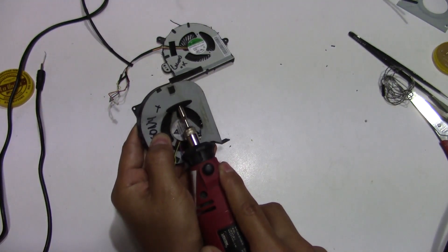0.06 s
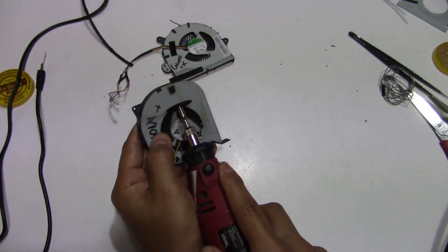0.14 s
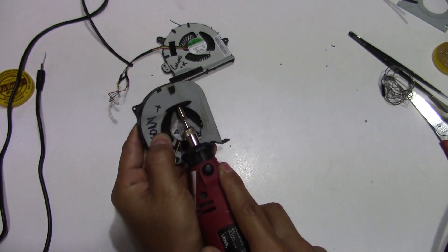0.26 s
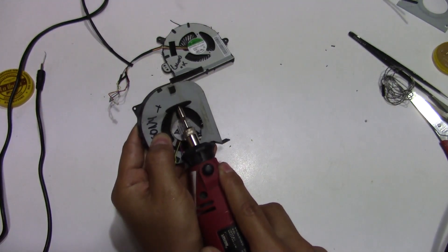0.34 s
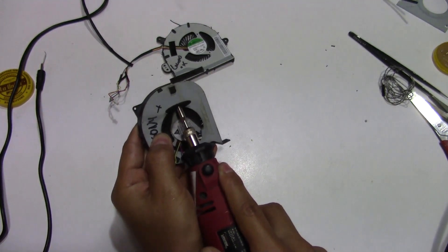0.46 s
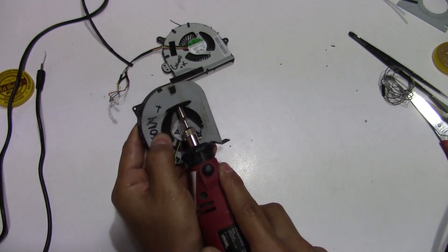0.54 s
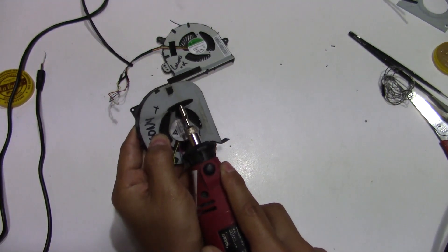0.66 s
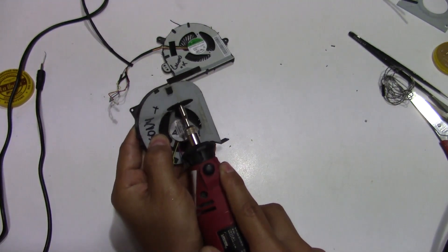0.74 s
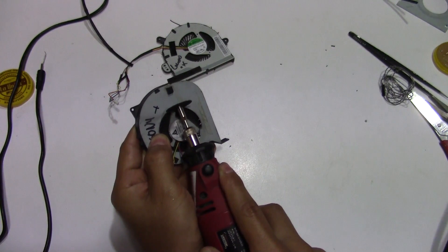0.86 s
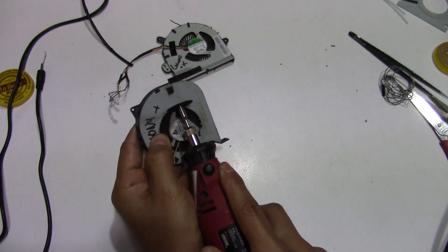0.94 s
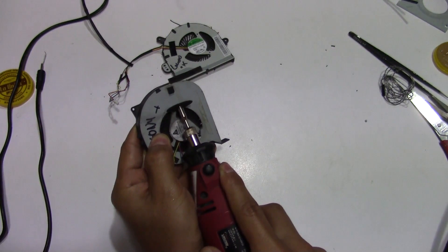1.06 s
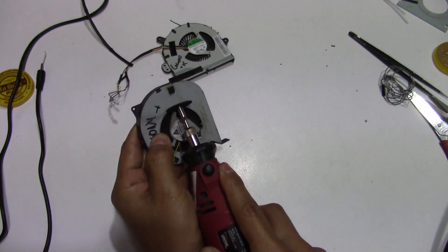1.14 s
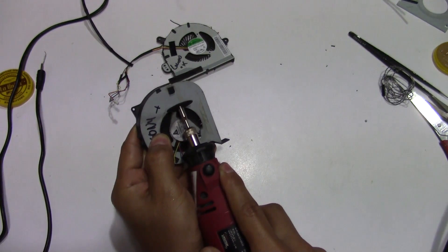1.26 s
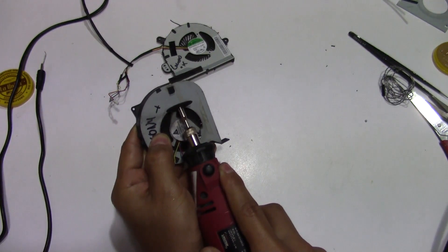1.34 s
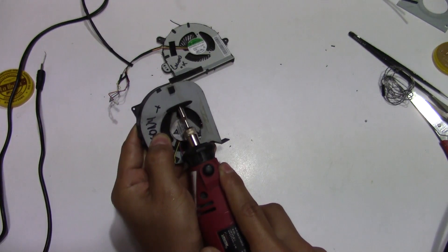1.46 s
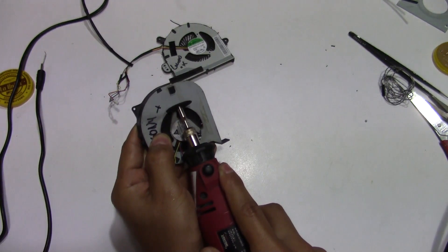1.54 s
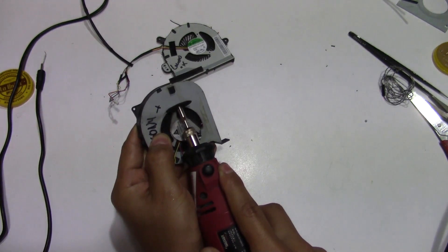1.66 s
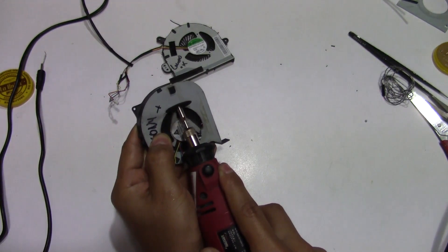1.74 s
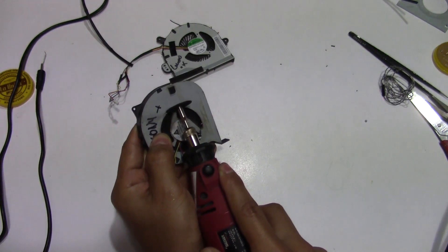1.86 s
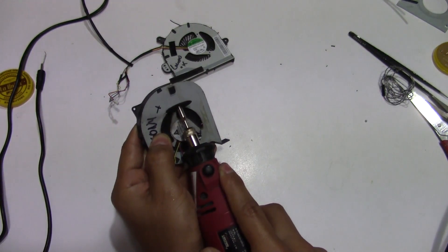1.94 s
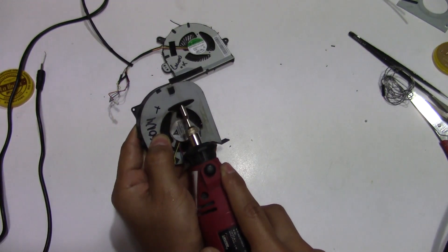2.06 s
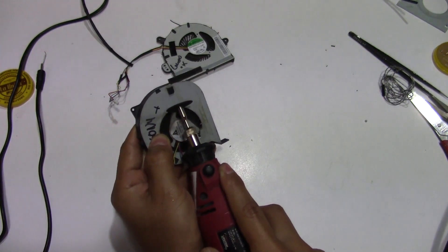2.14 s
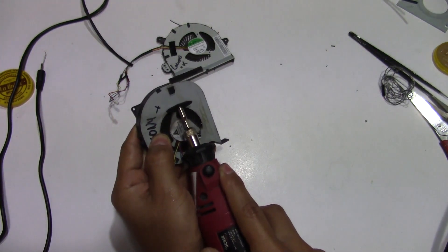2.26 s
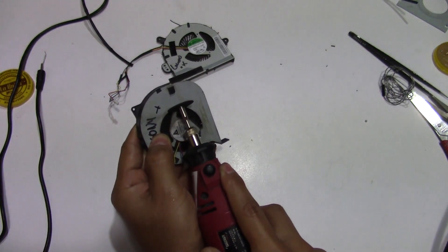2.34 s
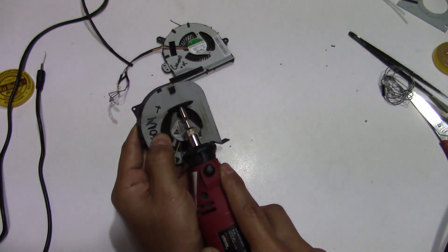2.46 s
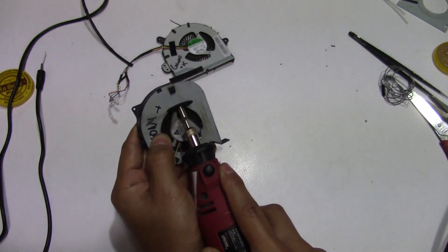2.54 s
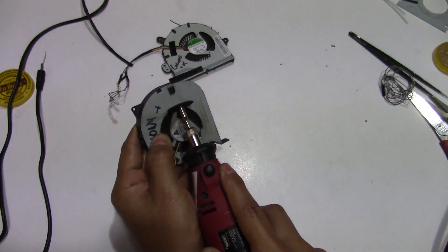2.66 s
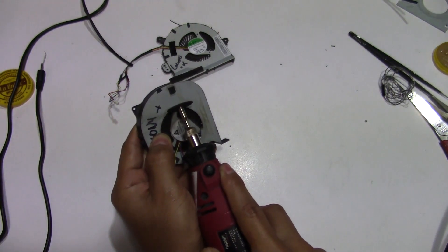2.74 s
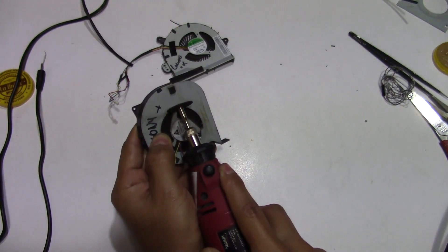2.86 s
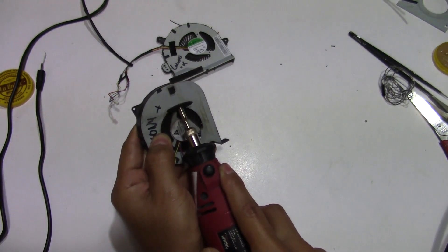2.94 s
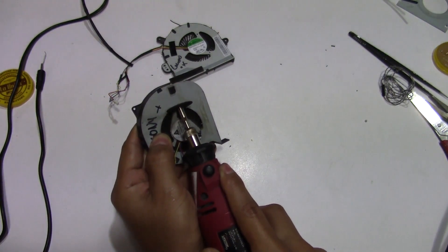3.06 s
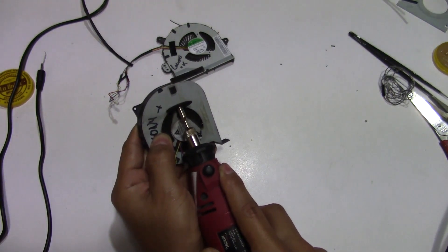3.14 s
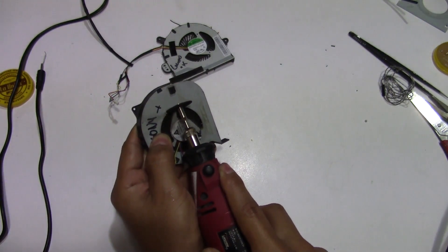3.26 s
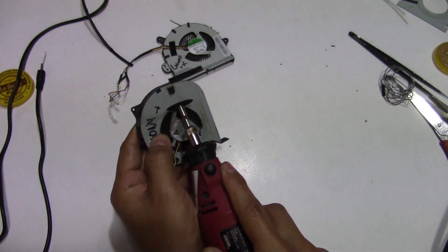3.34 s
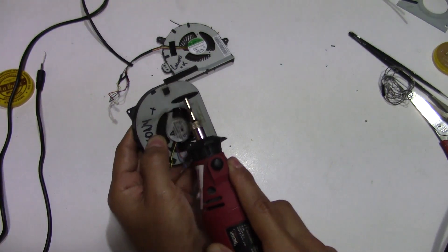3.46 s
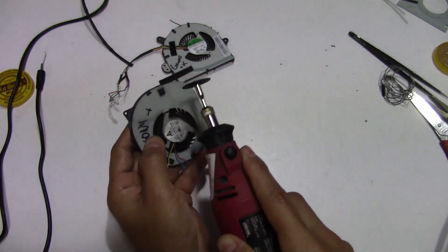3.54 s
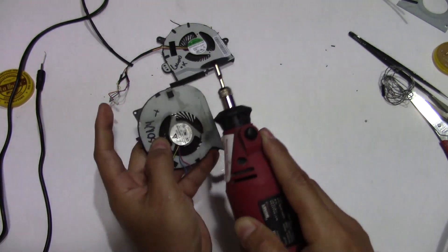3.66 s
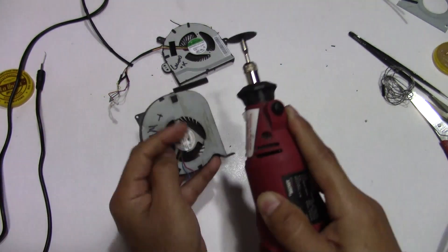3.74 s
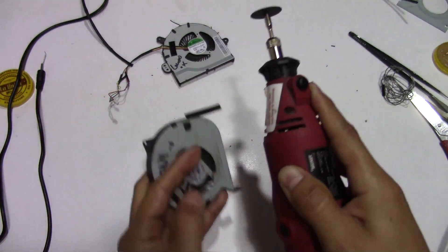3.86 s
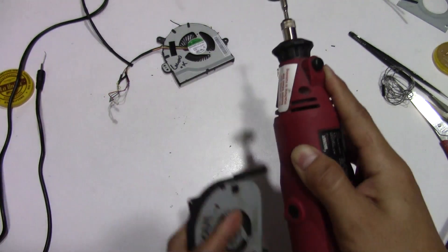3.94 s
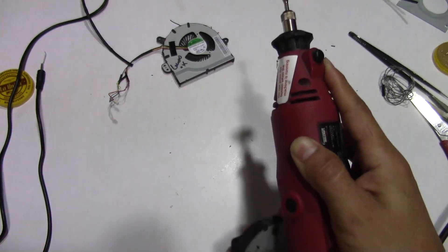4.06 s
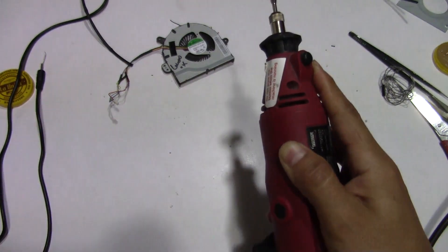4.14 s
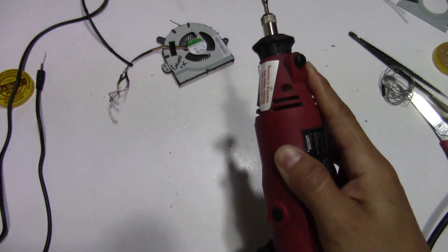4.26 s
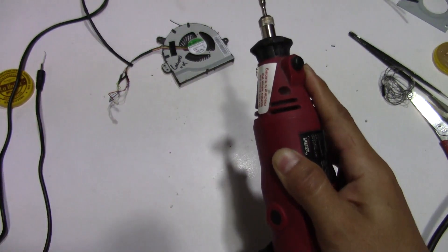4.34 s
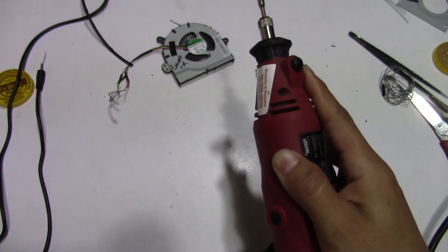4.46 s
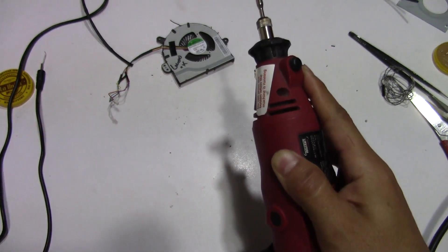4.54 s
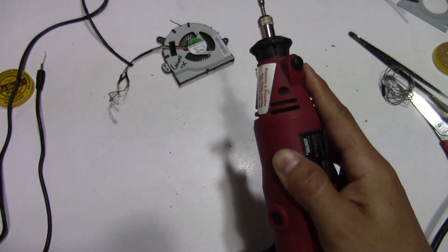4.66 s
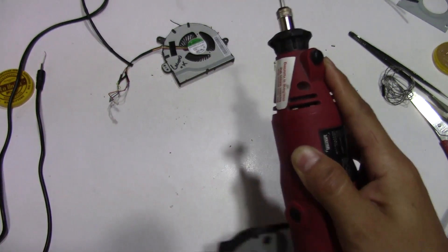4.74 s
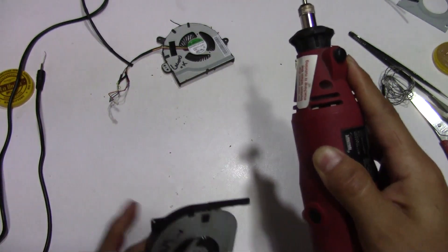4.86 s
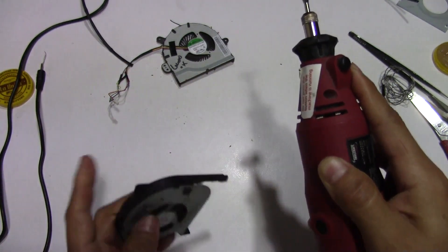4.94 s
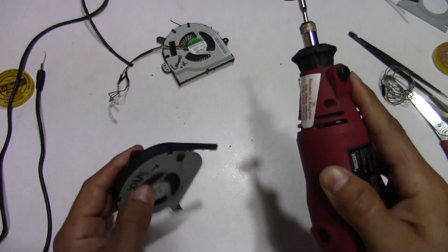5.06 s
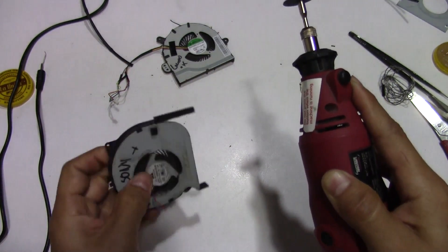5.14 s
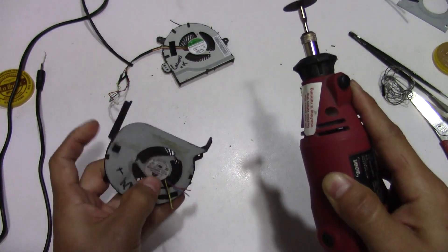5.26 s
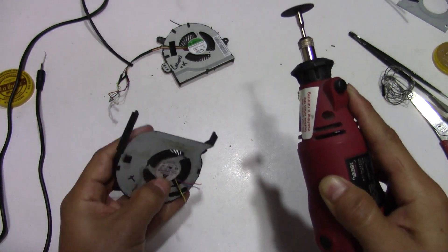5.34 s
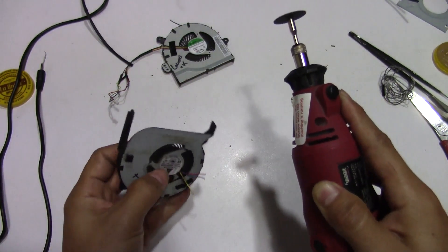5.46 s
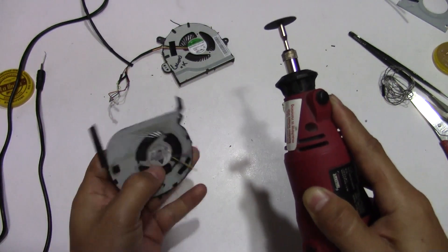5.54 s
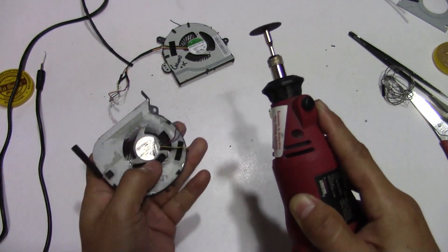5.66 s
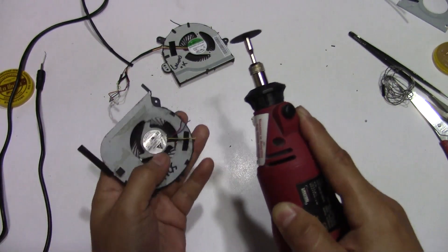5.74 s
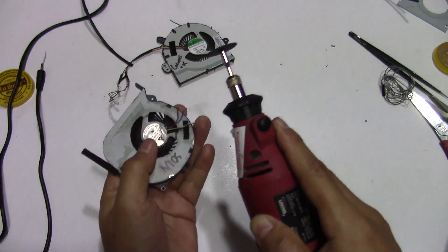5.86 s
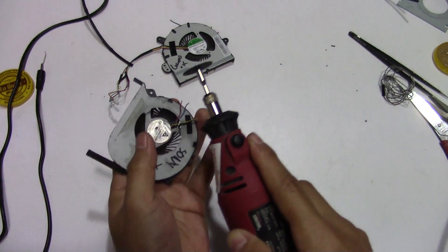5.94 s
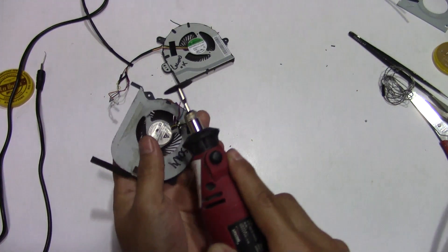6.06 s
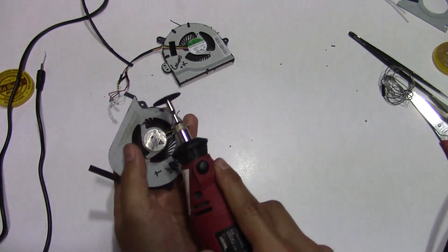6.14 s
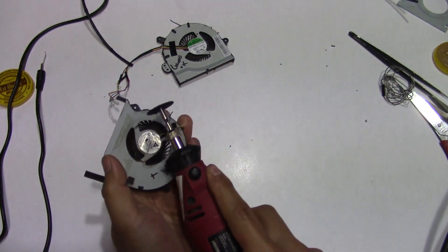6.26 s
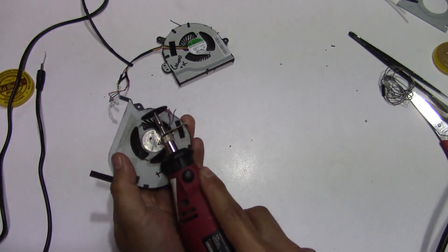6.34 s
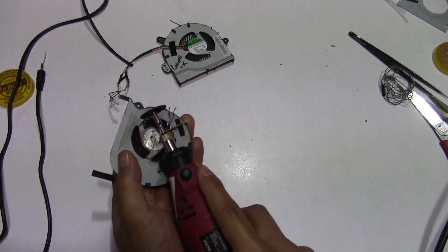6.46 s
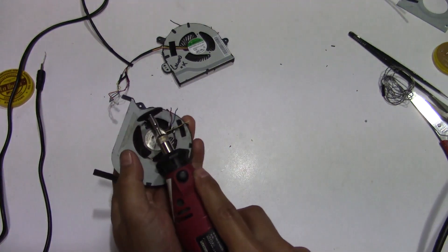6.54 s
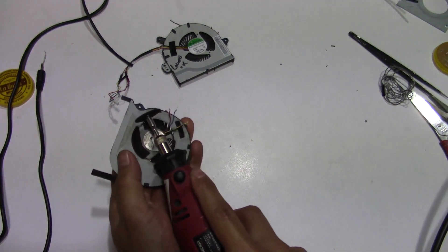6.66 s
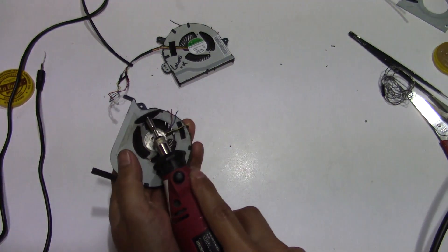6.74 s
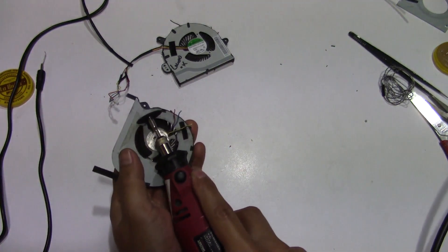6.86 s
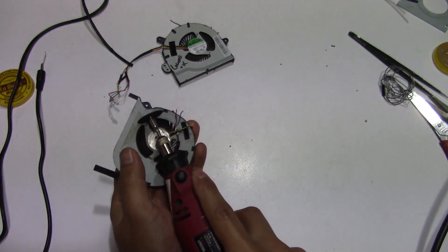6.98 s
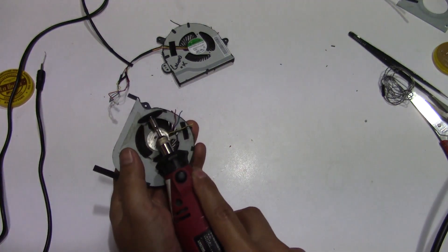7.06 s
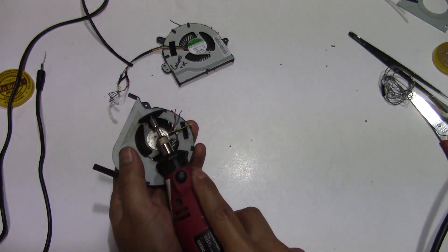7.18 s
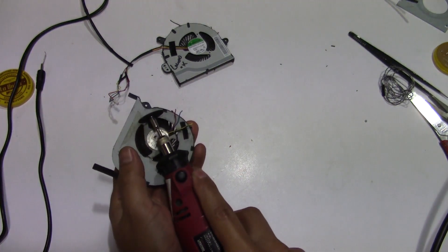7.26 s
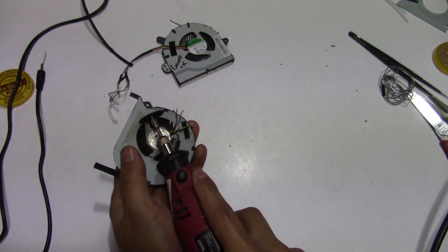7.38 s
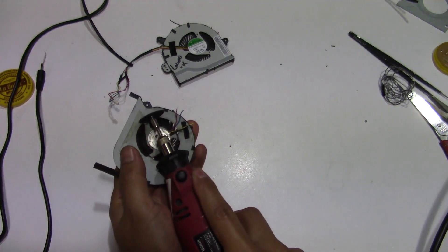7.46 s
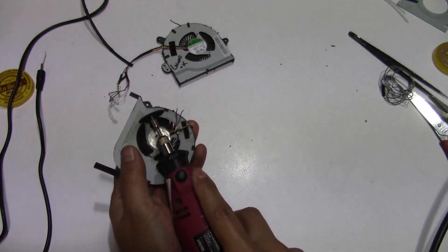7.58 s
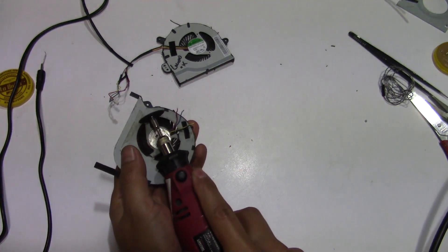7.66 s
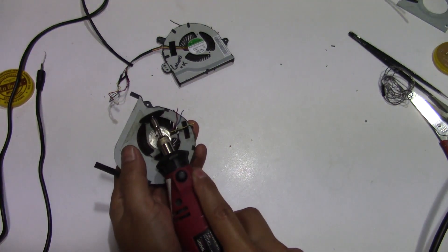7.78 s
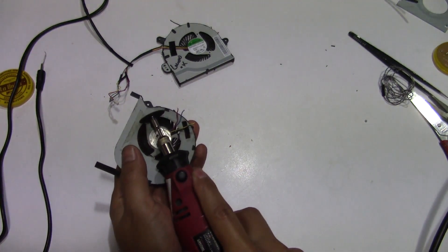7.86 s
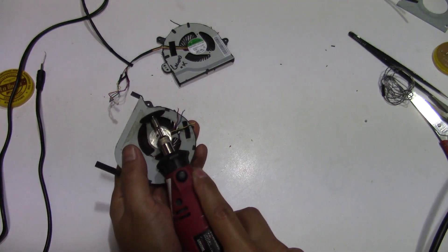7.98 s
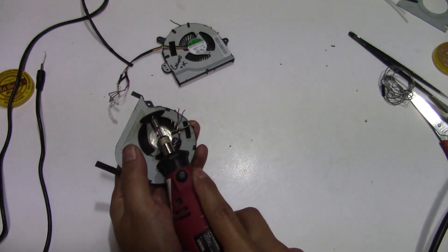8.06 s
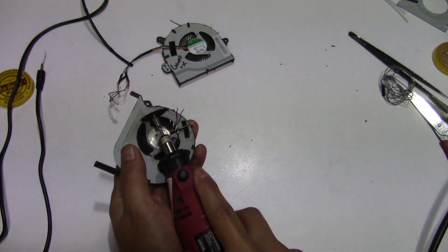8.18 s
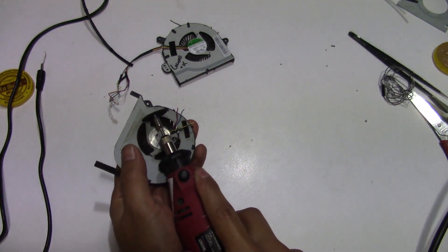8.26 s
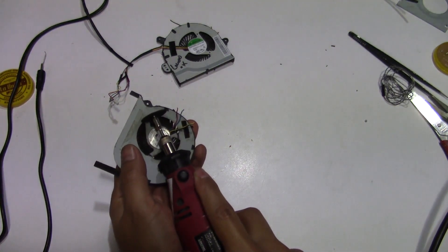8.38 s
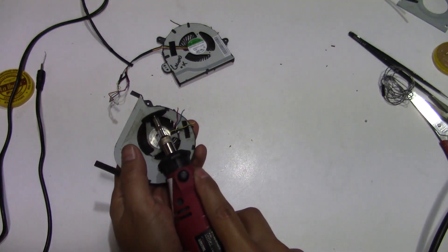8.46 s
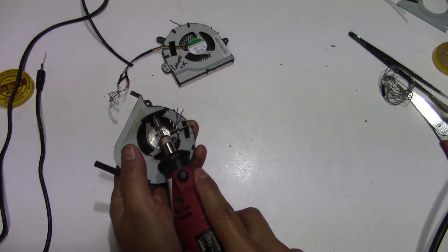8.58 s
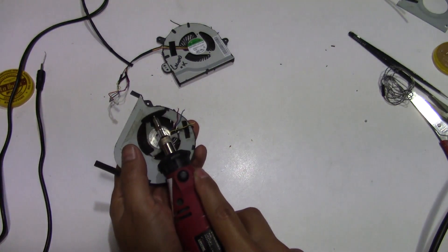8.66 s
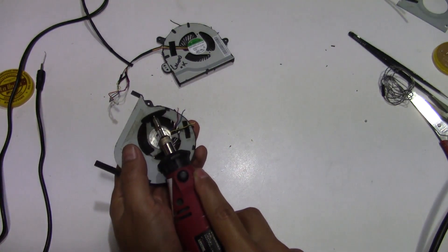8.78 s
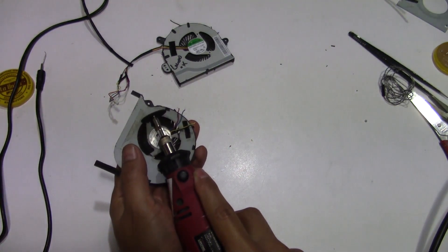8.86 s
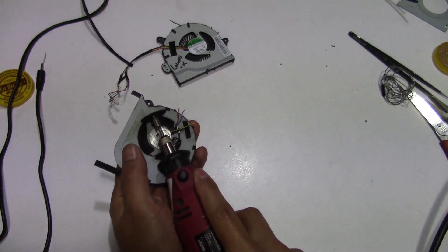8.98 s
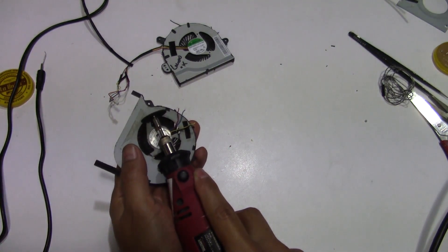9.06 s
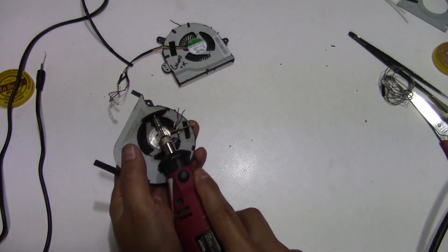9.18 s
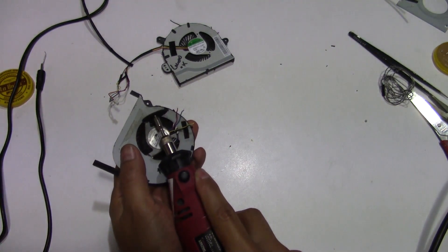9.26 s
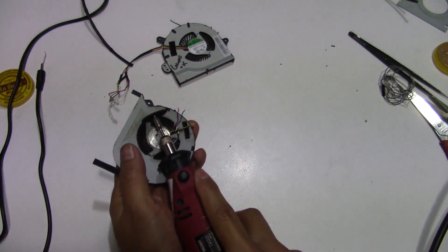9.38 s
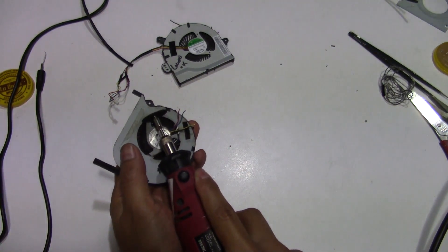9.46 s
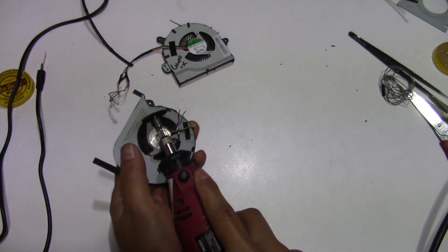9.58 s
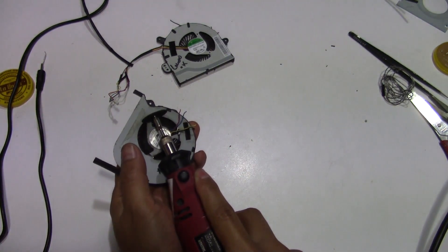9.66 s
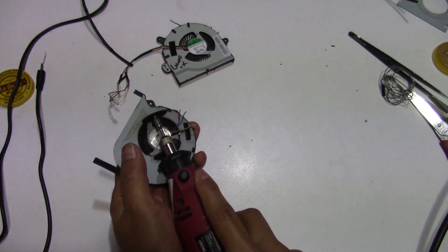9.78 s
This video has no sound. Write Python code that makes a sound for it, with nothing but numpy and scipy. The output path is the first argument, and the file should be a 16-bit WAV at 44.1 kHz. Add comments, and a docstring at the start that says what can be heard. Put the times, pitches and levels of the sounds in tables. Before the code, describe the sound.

A small electric rotary tool labours at low speed, its disc scraping through plastic in three rasping passes. The motor then runs up freely to a buzzing whine with a hiss of air, before biting in again with harsher, rattling cuts, squeals and brief cracks. Its pitch sags under each cut. The sound is close to the microphone, indoors at a desk.

```python
"""A gritty, juddering grind, close up: a handheld rotary tool cuts a small fan's plastic frame on a desk.
Three slow cuts nearly stall the motor; lifted clear, it runs up to a free whine, then makes faster cuts.
The disc's grit scrapes and rings the frame, hardest as the disc bounces, with snatches and screeches.
The motor sings at multiples of its shaft speed and throbs with the mains; its brushes and fan hiss."""
import sys
import numpy as np
from scipy import signal
from scipy.fft import rfft, irfft
from scipy.io import wavfile
from scipy.ndimage import uniform_filter1d, minimum_filter1d

SR = 44100
rng = np.random.default_rng(int(sys.argv[2]) if len(sys.argv) > 2 else 0)


def log_audio(samples):
    """Write samples as a 16-bit WAV file to the path given in sys.argv[1]."""
    # one column per channel
    frames = np.atleast_2d(samples).T
    # limit to full scale, then quantise
    limited = np.clip(frames, -1, 1)
    pcm = np.round(limited * 32767).astype(np.int16)
    wavfile.write(sys.argv[1], SR, pcm)


N = 432621
T = np.arange(N) / SR
FREQ = np.maximum(np.arange(N // 2 + 1) * SR / N, 1)
FREE_HZ, MAINS_PULSE_HZ = 245.6, 120  # unloaded shaft speed; two current pulses per mains cycle


# Load on the shaft, one row per cut: braking at the start/(Hz/s), at the end/(Hz/s)
BRAKING = [(217, 115), (189, 151), (200, 242), (225, 225), (0, 115), (69, 136), (70, 40)]
def shaft_speed(start_hz=57.9, pull_hz_per_s=150.6, step_s=0.001):
    """Turns per second: the motor pulls towards its free speed and each cut brakes it."""
    t = np.arange(0, T[-1] + step_s, step_s)
    drag = sum(np.interp(t, cut[:2], braking, left=0, right=0) for cut, braking in zip(CUTS, BRAKING))
    hz = [start_hz]
    for braking in drag[:-1]:
        pull = pull_hz_per_s * (1 - (hz[-1] / FREE_HZ) ** 1.52)
        hz.append(max(hz[-1] + step_s * (pull - braking), 2))
    return np.interp(T, t, hz)


# Ring of the frame as gripped for the slow and for the fast cuts: f/Hz, width/Hz, level/dB
FRAME_SLOW = [(1421, 196, 7.5), (1830, 290, 3), (2540, 530, 0.5), (2935, 290, 3), (3507, 470, 3.5),
              (4150, 150, -3), (4674, 290, -4), (5340, 66, -1.5), (5900, 450, -4.5), (6190, 250, -6.5),
              (6670, 500, -5), (7590, 380, -4.5), (8650, 490, -2), (9400, 250, -3), (10300, 1530, -4.5),
              (10800, 1900, -10), (12400, 330, -14), (14450, 400, -11), (15330, 130, -8)]
FRAME_FAST = [(1510, 890, 3.5), (1943, 440, 1), (2564, 89, 6), (3500, 930, 2), (4890, 350, -1),
              (5580, 220, -5.5), (6220, 810, 0), (6810, 1700, -2), (8870, 1130, -0.5), (10440, 800, -2),
              (11720, 1350, -3), (13280, 650, -2), (14300, 600, -14), (15100, 450, -7)]
# Cut cues: start/s, end/s, swell/s, scrape level/dB, body level/dB, bounce/0-1, grip (0 slow, 1 fast)
CUTS = [(-.05, .725, .02, -19, -24, 0.37, 0), (1.018, 2.078, 0.084, -17.5, -23, 0.45, 0),
        (2.398, 3.205, 0.066, -15.5, -21, 0.46, 0), (3.198, 3.322, 0.02, -28.5, -24, 0, 0),
        (7.741, 8.254, 0.39, -10.5, -17.5, 0.89, 1), (8.526, 9.28, 0.14, -10.5, -17.5, 0.92, 1),
        (9.673, 9.84, 0.16, -5.5, -8.5, 0.98, 1)]
def cuts(turns, hz, release_s=0.019, bounce_s=0.00068, crossover_hz=4500):
    """Grit scrapes the frame as the disc bounces: every turn in slow cuts, every other in fast ones."""
    low = 1 / (1 + (FREQ / crossover_hz) ** 8)
    out = 0
    for grip, (frame, turns_per_bounce) in enumerate([(FRAME_SLOW, 1), (FRAME_FAST, 2)]):
        scrape_gain, body_gain, bounce = np.zeros((3, N))
        for start, end, swell, scrape_db, body_db, depth, _ in (c for c in CUTS if c[-1] == grip):
            age = np.maximum(T - start, 0)
            touch = np.clip((end - T) / release_s + 0.1, 0, 1)
            attack = (1 - np.exp(-age / swell)) ** 0.37
            sink = (1 - np.exp(-age / swell / 2.9)) ** 0.34  # the body swells as the disc sinks in
            octaves = np.log2(hz / np.interp(start, T, hz))  # a slowing disc cuts more quietly
            scrape_gain += touch * attack * undb(scrape_db + 6 * octaves)
            body_gain += touch * sink * undb(body_db + 2.5 * octaves)
            bounce[T > start] = depth
        bounce *= np.minimum(hz / 36, 1)  # the disc steadies near a stall
        hops = turns / turns_per_bounce + 0.082 * walk(38)
        period = turns_per_bounce / hz
        bite = undb(0.9 * rng.standard_normal(N // 10))[hops.astype(int)]
        strike = np.exp(-((hops % 1 - .5) * period / bounce_s) ** 2)
        strike *= np.sqrt(period / bounce_s / np.sqrt(np.pi / 2))  # mean power 1
        scrape = grit(turns, 1.0, count=400) * np.sqrt(1 - bounce ** 2 + (bounce * bite * strike) ** 2)
        treble, body = (shape(scrape, resonances(frame) * np.sqrt(share)) for share in (1 - low, low))
        out = out + scrape_gain * treble + body_gain * body
    return out


# Lead tones of the unbalance, the fan and the eight armature slots: f/shaft speed
TONE_ORDERS = (1, 3, 8, 16, 24, 32)
# Their voicing before the resonances: full-speed level/dB, slope/(dB/octave), throb depth, rasp/dB
TONES = [(-29, 12, .04, -7), (-24.5, 20.5, 1.3, -5), (-29, 8.5, 0.18, 2), (-30, -1, 0.4, -1.5),
         (-25.5, 6.5, 0.17, -3), (-32.5, 1.5, 0.14, 5.5)]
# Resonances they glide through: f/Hz, width/Hz, level/dB
TONE_RESONANCES = [(600, 99, -0.5), (750, 200, -2.5), (1390, 120, 0), (1900, 82, 0), (2770, 390, 6.5),
                   (3490, 380, -3), (3960, 490, 2.5), (4530, 250, -4), (5460, 850, -6.5), (6600, 1200, 1),
                   (7100, 1200, 6.5)]
# Faint overtones: f/shaft speed; level/dB at full speed
FAINT_ORDERS = (2, 4, 5, 6, 7, 9, 10, 13, 15, 17, 28, 30)
FAINT_DB = [-49, -54.5, -42, -44.5, -50, -37, -43, -47, -33.5, -47.5, -53, -47]
# Sizzle of the upper slot tones: f/shaft speed; level/dB
SIZZLE_ORDERS = (40, 48, 56, 64)
SIZZLE_DB = [-34.5, -38, -38, -43]
def whine(turns, hz, onset_hz=58.6, floor_db=-19.5):
    """Unbalance, fan and armature slots sing at multiples of the shaft speed and throb with the mains."""
    angle, octaves = 2 * np.pi * turns, np.log2(hz / FREE_HZ)
    mains = np.cos(2 * np.pi * MAINS_PULSE_HZ * T)
    lead = 0
    for order, (db, db_per_octave, depth, rasp_db) in zip(TONE_ORDERS, TONES):
        tone = np.sqrt(2) * np.cos(order * angle) + undb(rasp_db) * hoarse(order * angle, 19 * order)
        level = undb(db + db_per_octave * octaves + 1.35 * walk(6.7))
        lead = lead + level * unit(np.exp(depth * mains)) * unit(tone)
    lead /= 1 + (onset_hz / hz) ** 4
    lead = irfft(rfft(lead) * np.hypot(resonances(TONE_RESONANCES), undb(floor_db)), N)
    faint = sum(undb(db + 4.6 * walk(14)) * np.sqrt(2) * np.cos(order * angle + 2 * np.pi * rng.random())
                for order, db in zip(FAINT_ORDERS, FAINT_DB))
    sizzle = sum(undb(db) * (hoarse(order * angle, 360) + 0.24 * np.cos(order * angle))
                 for order, db in zip(SIZZLE_ORDERS, SIZZLE_DB))
    sizzle_gain = 1 / (1 + ((hz - 173) / 91) ** 2) / (1 + (onset_hz / hz) ** 2)  # peaks at mid speed
    return lead + faint * throb(1.0) * (hz / FREE_HZ) ** 5 + sizzle * throb(0.32) * sizzle_gain


def lift(peak_s=4.93, half_s=0.54, boost_db=2.5):
    """Gain that brings the whine forward as the tool is lifted closer."""
    return undb(boost_db * np.exp(-((T - peak_s) / half_s) ** 2))


# Ring of the motor housing: f/Hz, width/Hz, level/dB
HOUSING = [(710, 730, -11.5), (1310, 135, 2.5), (1804, 98, 4.5), (2780, 460, 4.5), (3810, 740, 5),
           (4640, 1300, 3), (6530, 860, 3), (7850, 2500, 2.5), (8450, 270, 2), (10600, 2100, -7)]
# EQ of the cooling air: f/Hz, level/dB
AIR_EQ = [(100, -27), (470, -17), (600, -1.5), (900, -7), (1200, 7), (1900, -2.5), (2300, 0.5), (3600, -6),
          (4700, -26), (6000, 0), (8000, -1.5), (11500, -41), (13400, -5.5), (15500, -23)]
def motor_rush(turns, hz, knee_hz=107, brush_db=-23, air_db=-24.5, idle_air_db=-46):
    """Brushes rub and spark on the commutator and ring the housing; fan air rises steeply with speed."""
    throb_depth = np.interp(hz, [60, 220], [.32, .1])
    brush = shape(grit(turns, 1.2, count=500) * throb(throb_depth), resonances(HOUSING))
    air = shape(grit(turns, 1.9, count=400) * throb(.15), colour(AIR_EQ))
    brush_gain = undb(brush_db) / np.sqrt(1 + (knee_hz / hz) ** 4.94)
    air_gain = undb(air_db) * (hz / FREE_HZ) ** 6 + undb(idle_air_db) * np.minimum(hz / 35, 1)
    return brush * brush_gain + air * air_gain


# Screech cues: start/s, end/s, f/shaft speed, level/dB, roughness width/Hz
SCREECHES = [(7.947, 8.24, 16, -25, 180), (8.68, 9.077, 44, -21, 170), (8.85, 9.14, 33, -19, 200),
             (8.976, 9.284, 8, -23.5, 14)]
def screeches(turns):
    """Rough squeals and groans locked to the disc, falling as it slows."""
    out = 0
    for start, end, order, db, width_hz in SCREECHES:
        fade = np.exp(-((2 * T - start - end) / (end - start)) ** 4)
        out = out + undb(db) * fade * hoarse(2 * np.pi * order * turns, width_hz)
    return out


# Runs of snatches: t/s, length/s, spacing/turns, relative level/dB, squeak f/Hz
SNATCHES = [(0.979, .04, 2, -7, 10580), (1.028, .056, 1, 0, 6950), (1.106, .035, 2, -1, 6980),
            (2.326, .02, 1, -12.5, 6230), (2.37, .04, 2, 0, 10500), (2.4174, .042, 1, 3, 6490),
            (3.377, .01, 1, -23, 6460), (3.428, .01, 1, -21, 9600), (6.98, .075, 2, -2.5, 12060),
            (7.001, .08, 2, -14, 6500), (9.559, .01, 1, -5, 7020), (9.594, 0.12, 5, -3, 7220),
            (9.613, .05, 4, -0.5, 11800)]
def snatches(turns, push_s=0.0014, crack_db=-11, squeak_db=-6, scatter_db=4.7, detune=0.028):
    """The disc's edge catches the plastic at the same point of its turn, with a crack and a squeak."""
    crack, squeak = np.zeros((2, N))
    t = T[:SR // 50]
    push = np.exp(-(t / push_s - 2) ** 2)
    for start, run_s, spacing, db, hz in SNATCHES:
        first, last = np.interp([start, start + run_s], T, turns)
        for i in np.searchsorted(turns, np.arange(first, last, spacing)):
            burst = undb(db + scatter_db * rng.standard_normal()) * push
            pitch = hz * (1 + detune * rng.standard_normal())
            crack[i:i + len(t)] += burst * rng.standard_normal(len(t))
            phase_drift = np.cumsum(0.17 * rng.standard_normal(len(t)))
            squeak[i:i + len(t)] += burst * np.sin(2 * np.pi * pitch * t + phase_drift)
    bright_frame = resonances(FRAME_FAST) * FREQ / (FREQ + 4000)
    return undb(crack_db) * np.std(crack) * shape(crack, bright_frame) + undb(squeak_db) * squeak


# Slide cues: t/s, length/s, level/dB
SLIDES = [(.86, 0.057, -43), (2.098, 0.052, -36.5), (2.138, 0.097, -40), (2.286, 0.043, -40)]
def slides():
    """The frame slides on the desk top with a dull rub."""
    rub = sum(undb(db) * np.exp(-(2 * (T - start) / length - 1) ** 4) for start, length, db in SLIDES)
    dull = colour([(60, -24), (170, -5), (250, 5), (350, 7), (480, -5), (820, 7), (1300, -81),
                   (8000, -70)])
    return rub * shape(noise(), dull)


# Mains hum: f/Hz, level/dB
HUM = [(120, -71.5), (240, -76), (360, -58), (600, -57)]
# EQ of the room tone: f/Hz, level/dB
ROOM_EQ = [(25, -41), (110, -23.5), (300, -13), (480, -13), (600, -4.5), (850, -0.5), (1500, -6),
           (2200, -9.5), (4000, -13), (8000, -31), (15000, -92)]
def room_tone(rush_db=-38):
    """A bed of soft steady rush and mains hum."""
    hum = sum(undb(db) * np.sqrt(2) * np.sin(2 * np.pi * (hz * T + rng.random())) for hz, db in HUM)
    return hum + undb(rush_db) * shape(noise(), colour(ROOM_EQ))


def reflections(x, wet_db, t60=0.27):
    """Short diffuse answer of the desk and walls."""
    t = T[:SR // 3]
    tail = rng.standard_normal(len(t)) * np.exp(-np.log(1000) * t / t60) * (t > .003)
    return undb(wet_db) * signal.fftconvolve(x, tail / np.linalg.norm(tail))[:N]


def grit(turns, scatter, count):
    """Ticks from `count` bumps around a spinning rim; their sizes scatter on every pass."""
    angles = (np.arange(count) + rng.random(count)) / count
    sizes = rng.standard_normal(count)
    passes = (np.arange(int(turns[-1]) + 1)[:, None] + angles).ravel()
    size = np.resize(sizes, len(passes)) + scatter * rng.standard_normal(len(passes))
    speed = np.interp(passes, turns, np.gradient(turns))
    size = size * (passes < turns[-1]) / np.sqrt(speed)  # equal power at any speed
    at = np.interp(passes, turns, 2 * np.arange(N))  # twice oversampled
    index, fraction = at.astype(int), at % 1
    ticks = np.bincount(index, size * (1 - fraction), 2 * N)
    ticks += np.bincount(index + 1, size * fraction, 2 * N)
    return unit(signal.resample_poly(ticks, 1, 2))


def throb(depth):
    """Tremolo from the pulsing motor current, rms 1."""
    return unit(1 + depth * np.cos(2 * np.pi * MAINS_PULSE_HZ * T))


def hoarse(angle, width_hz):
    """A tone smeared into a narrow rough band, rms 1."""
    return walk(width_hz) * np.cos(angle) + walk(width_hz) * np.sin(angle)


def resonances(modes, skirt=1.48):
    """Gain per frequency of a small body; it radiates little bass."""
    power = sum(undb(db) ** 2 / (1 + (2 * (FREQ - hz) / width) ** 2) ** skirt for hz, width, db in modes)
    return np.sqrt(power / (1 + (1000 / FREQ) ** 4))


def colour(points):
    """EQ curve through points of f/Hz, level/dB."""
    hz, db = np.transpose(points)
    return undb(np.interp(np.log(FREQ), np.log(hz), db))


def shape(x, gain):
    """Filter by a gain per frequency, to rms 1."""
    return unit(irfft(rfft(x) * gain, N))


def walk(rate_hz):
    """Smooth random drift, rms 1."""
    return shape(noise(), 1 / (1 + (FREQ / rate_hz) ** 4))


def noise():
    return rng.standard_normal(N)


def unit(x):
    return x / np.sqrt(np.mean(x ** 2) + 1e-18)


def undb(db):
    return 10 ** (np.asarray(db) / 20)


def scene():
    """The shaft speed drives motor and disc; the desk and walls answer, in narrow stereo."""
    hz = shaft_speed()
    turns = np.cumsum(hz) / SR
    motor = lift() * whine(turns, hz) + motor_rush(turns, hz)
    disc = cuts(turns, hz) + screeches(turns) + snatches(turns)
    sound = motor + disc + slides() + room_tone()
    mid = sound + reflections(sound, wet_db=-12)
    # left and right part mostly in the bass and treble
    width = colour([(250, -21), (600, -30.5), (1500, -78), (4000, -30.5), (8000, -26.5), (12000, -31)])
    side = irfft(rfft(sound + reflections(sound, wet_db=-4)) * width * 1j, N)
    return np.array([mid + side, mid - side])


def record(dry, ceiling=0.85, top_hz=15750):
    """A fast limiter holds the loudest peaks, and a steep low-pass cuts the top."""
    headroom = np.minimum(1, ceiling / (np.abs(dry).max(axis=0) + 1e-9))
    gain = uniform_filter1d(minimum_filter1d(headroom, size=41), size=41)
    return signal.sosfilt(signal.ellip(10, .2, 80, top_hz, fs=SR, output="sos"), dry * gain)


dry = scene()
out = record(dry)
log_audio(out)
```